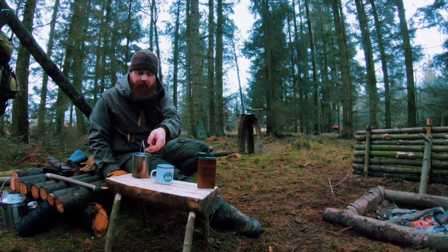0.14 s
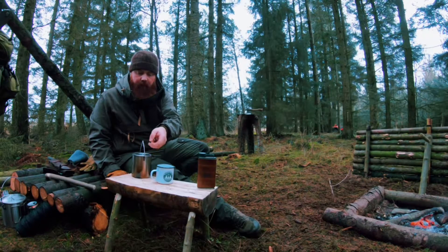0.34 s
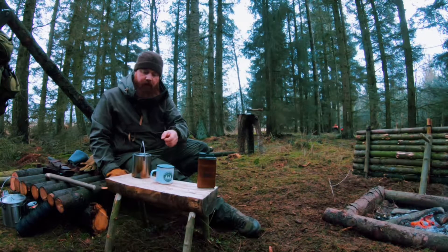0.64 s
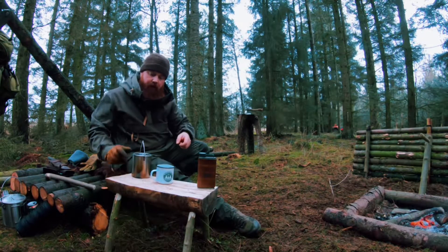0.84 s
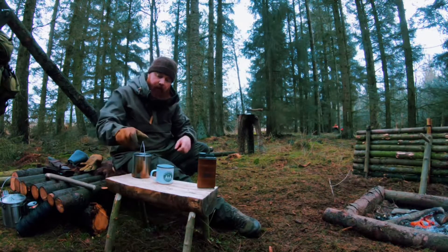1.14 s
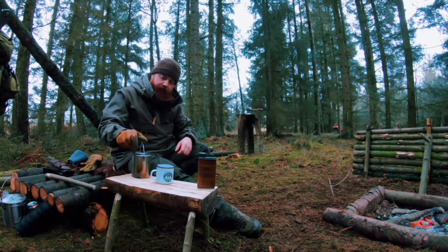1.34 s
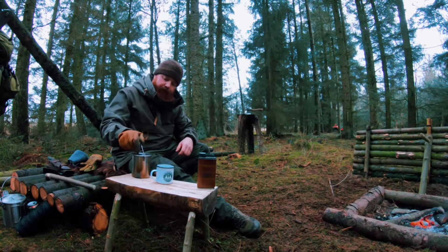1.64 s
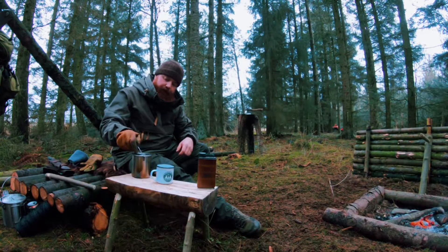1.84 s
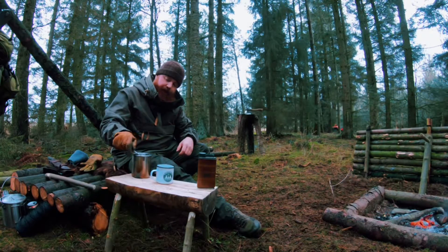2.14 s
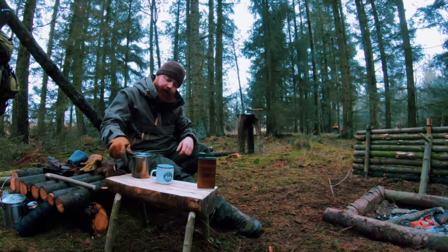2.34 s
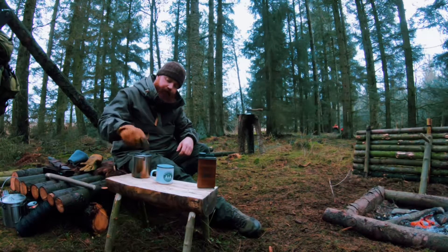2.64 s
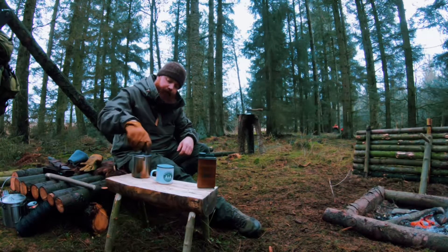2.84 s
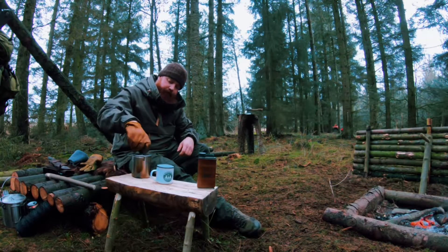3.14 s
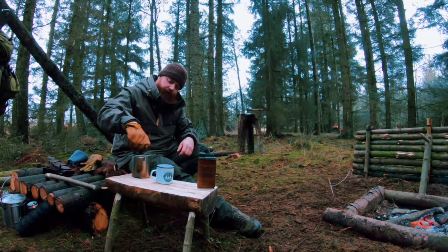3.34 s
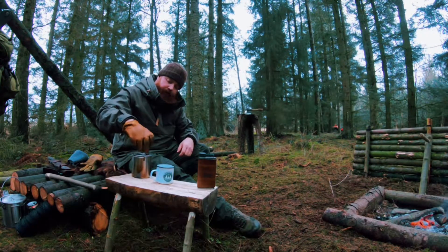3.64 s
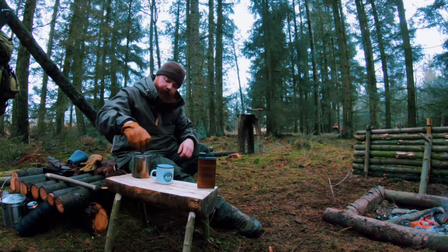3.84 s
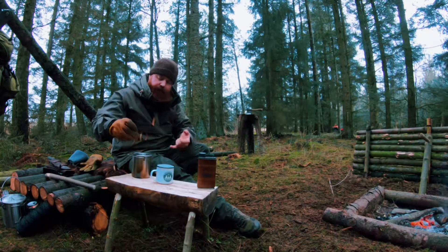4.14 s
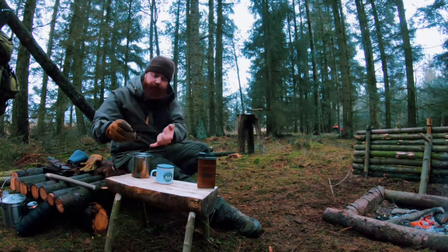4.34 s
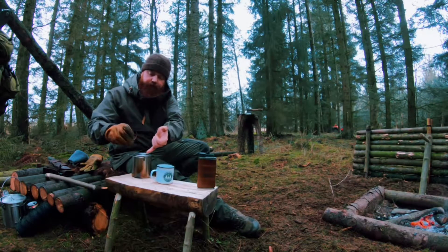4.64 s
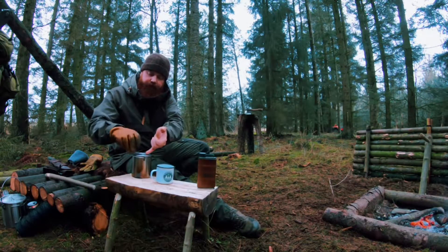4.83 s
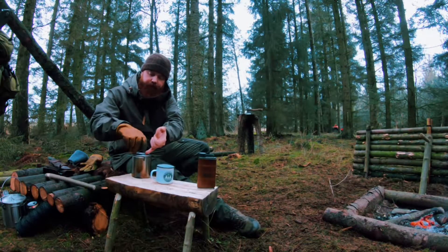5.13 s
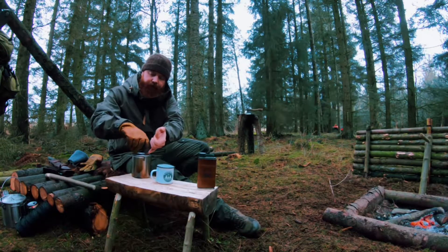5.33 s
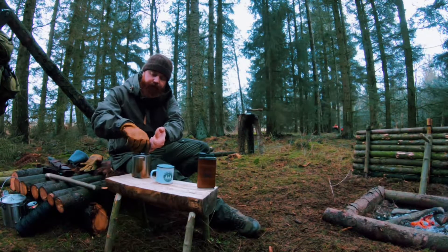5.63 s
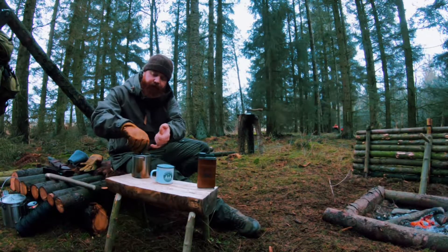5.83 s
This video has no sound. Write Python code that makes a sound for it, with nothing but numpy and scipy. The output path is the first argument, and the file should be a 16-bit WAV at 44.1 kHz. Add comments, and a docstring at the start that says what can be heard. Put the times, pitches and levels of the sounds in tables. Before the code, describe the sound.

Light, uneven metal clinks and tiny scrapes sound near the microphone as a spoon moves around a steel mug, some with a small thud into the plank below. They start with a bright ringing knock, thin out, then get busier in the middle. Two brief sleeve swishes and occasional dry fire cracks fall between them. The outdoor background is a low far-off engine rumble with a faint hiss of trees.

```python
"""Forest camp: a steel spoon stirs and knocks in a steel mug on a plank table.
Each contact skids, rings the thin wall briefly and thuds into the plank; a loose spoon rings on.
A jacket rustles, its zip pull taps, burning wood snaps. Trunks return a faint echo of mug and fire.
Behind: a far engine's rumble, the forest's wash, slow air pressure on the microphone."""
import sys
import numpy as np
from scipy import signal
from scipy.fft import rfft, irfft
from scipy.io import wavfile

SR = 44100
rng = np.random.default_rng(int(sys.argv[2]) if len(sys.argv) > 2 else 0)


def store_wav(level_fs):
    """Save 16-bit WAV to argv[1]."""
    pcm = np.round(np.clip(np.atleast_2d(level_fs), -1, 1) * 32767)
    wavfile.write(sys.argv[1], SR, pcm.T.astype(np.int16))


N = 263718
TIME_S = np.arange(N) / SR

# engine exhaust and whine tones: shaft_multiple, level_db
EXHAUST_TONES = [(2, -40), (3, -38), (4, -48.5), (6, -55.5)]
WHINE_TONES = [(18, -22.5), (36, -10), (54, -16.5)]
# gain curves of exhaust plus rumble, and of the whine: time_s, gain_db
ENGINE_LOW_GAIN = [(0, 0), (2.0, 2.5), (3.85, 2.2), (4.15, -1), (5.95, 0)]
WHINE_GAIN = [(0, -7), (1.6, 0.5), (5.95, 0.5)]
# noise spectra: freq_hz, density_db
RUMBLE_SPECTRUM = [(5, 5), (12, -2), (22, 4), (30, 2.5), (42, -1), (52, -6), (70, -5.5), (90, -7.5),
                   (115, -14.5), (160, -22), (300, -34), (1000, -72)]
WASH_SPECTRUM = [(110, 2), (170, -2), (270, -5), (400, -1.5), (620, 4), (900, 2.5), (1150, 1.5), (1600, -4),
                 (2300, -13), (3500, -21.5), (6000, -37), (16000, -49)]
HISS_SPECTRUM = [(300, -1.5), (2000, 5.5), (4000, 1.5), (7000, 2), (10000, 0.5), (13000, -2), (16000, 1)]
CLOTH_SPECTRUM = [(150, -10), (400, 2), (700, 5.5), (1400, 2.5), (2700, 0), (4000, -7), (6500, -11),
                  (8300, -8), (10000, -19.5), (13000, -12), (16000, -50)]
# sleeve strokes: middle_s, level_db, half_width_s
SLEEVE_STROKES = [(.6, -36.5, 0.16), (0.803, -29, 0.11), (1.02, -38, 0.24), (4.087, -28.7, 0.068),
                  (4.27, -33.8, .15)]
# sleeve folds flicking over, zip pull taps: start_s, level_db
FOLD_FLICKS = [(0.807, -23.5), (4.104, -26)]
ZIP_TAPS = [(0.794, -18), (0.812, -25), (4.1036, -32)]
# fire snaps: start_s, level_db, peak_hz
FIRE_SNAPS = [(1.2706, -37, 5500), (3.125, -31, 7500), (5.301, -18.5, 2900)]
# splits between the thud, body, wall, bright and top bands: edge_hz
BAND_SPLITS_HZ = [800, 1900, 4200, 10000]
# knock balance, one row a band: plain_db, hardness_share, loose_spoon_db
BAND_BALANCE = [(0, -0.14, 0), (-6.5, -.5, 3), (0, -0.037, 0), (-6.5, 0.23, 6), (-14, 0.83, -1)]
# mug wall modes: pitch_hz, level_db
MUG_MODES = [(1060, -4), (1270, 0), (1790, -20), (2250, -4.5), (2510, 1.5), (2610, 0.5), (2710, -1),
             (2930, -8), (3020, -14.5), (3210, -3.5), (3510, -2), (4400, -6), (5000, -3), (5280, -1.5),
             (6020, 3), (6250, -2), (6550, 4), (7200, 7), (7380, 5), (7860, 8), (8080, -5), (8470, 2),
             (8900, -7), (11990, 6.5), (12300, 1), (12700, 7), (13630, 7)]
# the mug's crowded weak modes: freq_hz, density_db
WEAK_MODE_SPECTRUM = [(200, 3), (500, -0.5), (1200, -2.5), (1750, -5.5), (2400, 0.5), (3600, 2.5),
                      (4100, -4.5), (4700, -1), (6000, 5.5), (7900, 3), (9800, -3), (11300, -5.5),
                      (12300, 4), (15500, -5.5)]
# spoon modes: pitch_hz, level_db, t60_s
SPOON_MODES = [(1226, -3, 0.13), (2670, -2.5, 0.13), (3040, 2.5, 0.064), (3235, -0.5, 0.14),
               (3494, 2, 0.057), (4360, -7.5, 0.2), (5930, -8, 0.13), (6040, -18, .28), (7120, 2.5, 0.095),
               (7505, 0, 0.074), (7040, 1, 0.06), (8300, -12, 0.085), (8885, -4, 0.19), (9020, -8, 0.19),
               (10860, -18, .35), (12200, -4, .06), (12800, -1, 0.14), (15470, 0, .08)]
# spoon on mug; hardness adds treble, depth adds thud:
# start_s, level_db, hardness_db, depth_db, skid_s, spoon_ring_db, thud_hz,
# favoured_low_hz, favoured_high_hz
KNOCKS = [(0.057, -29, 7, -11, 0.00094, -15, 520, 3200, 7350),
          (0.1555, -25.5, 2, -4, .016, -13, 442, 3020, 12300),
          (0.1901, -13, 12.5, -10.5, 0.0011, 7, 660, 3460, 8880),
          (1.3143, -23.5, -4, -9, 0.015, -5, 454, 2460, 6020),
          (1.923, -35, 9, 0.5, .004, -6, 200, 3230, 7280),
          (1.9941, -31.5, -2, -11, .005, -10, 400, 3020, 7220),
          (2.0338, -33.5, -5, -6, .002, -14, 220, 3000, 7200),
          (2.42, -38, 5, -2, .005, -20, 640, 3540, 8470), (2.441, -37.5, 9, -9, .013, -6, 200, 2250, 8470),
          (2.735, -20, -2, -6.5, .009, -16, 360, 2550, 6020),
          (2.7787, -31, -6, -20, .001, -22, 640, 2600, 6120),
          (2.9983, -30, -3, -8, .01, -14, 378, 3210, 7600),
          (3.0448, -25.5, 9, -19, 0.0026, -26, 470, 3580, 12700),
          (3.1916, -25.5, -5.5, -2.5, .006, -30, 560, 2690, 7700),
          (3.235, -41, 0, 4, .002, -20, 240, 3550, 7360), (3.401, -36, -7, -9, 0.026, -22, 450, 2120, 4600),
          (3.433, -30.5, -11, -20, 0.0083, -22, 650, 2710, 5000),
          (3.669, -26.5, 4, 0.5, 0.0067, -8, 610, 2540, 7190),
          (3.731, -25, 8, -13, .004, -20, 690, 2500, 5150),
          (3.7403, -16, -3, -18, 0.0054, -13, 710, 2490, 7950),
          (3.8047, -32, 0, 1, .003, -18, 590, 3200, 5010),
          (3.8258, -25, -6, -3.5, .008, -18, 414, 2740, 4950),
          (3.843, -29.5, 0, -12, .01, -16, 370, 2820, 4350),
          (4.884, -29.5, 5, 0, .015, -22, 410, 2610, 11980),
          (4.945, -39.5, -2, -1, .004, -20, 540, 2750, 7210),
          (4.9925, -27, -6, -8, .019, -7, 730, 3300, 4400),
          (5.366, -38, -11, 0, .017, -22, 700, 2520, 6200),
          (5.706, -35, -4, -8, 0.019, -22, 750, 2590, 7450),
          (5.7277, -27, -7, -22, .016, -22, 710, 3500, 12700),
          (5.7549, -23.5, 8, -21, .004, -22, 660, 2610, 11990)]


def amp(db):
    """Decibels to gain."""
    return 10 ** (np.asarray(db) / 20)


def unit_rms(x):
    """Scales to rms 1."""
    return x / np.sqrt(np.mean(x ** 2) + 1e-20)


def add(mix, start_s, sound):
    """Mixes a sound in at start_s."""
    part = mix[max(round(start_s * SR), 0):][:len(sound)]
    part += sound[:len(part)]


def coloured(x, spectrum):
    """Shapes x by a spectrum; rms 1."""
    hz, db = np.transpose(spectrum)
    f = np.fft.rfftfreq(len(x), 1 / SR)
    gain = amp(np.interp(np.log(f + 1), np.log(hz), db))
    return unit_rms(irfft(rfft(x) * gain, len(x)))


def wander(rate_hz):
    """Random drift up to about rate_hz; rms 1."""
    f = np.fft.rfftfreq(N, 1 / SR)
    lowpass = np.exp(-(f / rate_hz) ** 2) * (f > 0)
    return unit_rms(irfft(rfft(rng.standard_normal(N)) * lowpass, N))


def hump(middle_s, half_width_s):
    """Gaussian rise and fall; peak 1."""
    return np.exp(-((TIME_S - middle_s) / half_width_s) ** 2)


def impulses(t, rate_hz=2000):
    """Sparse random impulses."""
    return rng.standard_normal(len(t)) * (rng.random(len(t)) < rate_hz / SR)


def click(t, t60_s, ping_hz=3200):
    """Hard point contact: one pulse, a short ping, a spray of noise."""
    ping = amp(-11) * np.sin(2 * np.pi * ping_hz * t)
    spray = amp(-10) * rng.standard_normal(len(t))
    return amp(4) * (t == 0) + amp(-60 * t / t60_s) * (ping + spray)


def ring(hz, db, t60_s, t):
    """Sum of decaying modes at random phases."""
    phase = rng.random((len(hz), 1))
    envelopes = amp(db[:, None] - 60 * t / t60_s[:, None])
    return (envelopes * np.sin(2 * np.pi * (hz[:, None] * t + phase))).sum(0)


def balanced(blow, bands_db):
    """Sets five band levels by their rms over the first 20 ms."""
    out = 0
    edges_hz = [150, *BAND_SPLITS_HZ, 16500]
    for low_hz, high_hz, db in zip(edges_hz, edges_hz[1:], bands_db):
        bandpass = signal.butter(3, [low_hz, high_hz], "bandpass", fs=SR, output="sos")
        band = signal.sosfilt(bandpass, blow)
        out += amp(db) * band / np.sqrt(np.mean(band[:SR // 50] ** 2))
    return out


def air_pressure(corner_hz=1.97, level_db=-14):
    """Slow pressure swings on the microphone, below hearing."""
    ratio = np.fft.rfftfreq(N, 1 / SR) / corner_hz
    spectrum = np.exp(2j * np.pi * rng.random(len(ratio))) * np.sqrt(ratio) / (1 + ratio ** 4)
    return amp(level_db) * unit_rms(irfft(spectrum, N))


def swell_db():
    """Level of sound carried through the forest: steady but for one broad swell."""
    return -37 + 4.5 * hump(middle_s=3.23, half_width_s=0.8)


def shaft_tones(turns, tones, fade_db):
    """Shaft harmonics, fading in and out on their way through the trees."""
    out = 0
    for multiple, db in tones:
        gain = amp(db + fade_db * wander(4.4))
        out += gain * np.sin(2 * np.pi * (multiple * turns + rng.random()))
    return np.sqrt(2) * out


def far_engine(shaft_hz=21.15, speed_waver=0.00394, rumble_db=-32):
    """Steady engine: exhaust tones in a rumble, and a faint whine."""
    turns = np.cumsum(shaft_hz * (1 + speed_waver * wander(9.8))) / SR
    exhaust = shaft_tones(turns, EXHAUST_TONES, fade_db=3)
    rumble = amp(rumble_db) * coloured(rng.standard_normal(N), RUMBLE_SPECTRUM)
    whine = shaft_tones(turns, WHINE_TONES, fade_db=4)
    low_db = np.interp(TIME_S, *np.transpose(ENGINE_LOW_GAIN))
    whine_db = np.interp(TIME_S, *np.transpose(WHINE_GAIN)) + swell_db()
    return (exhaust + rumble) * amp(low_db) + whine * amp(whine_db)


def forest(wash_gain_db=2, sway_db=1, hiss_db=-40):
    """Distant swelling wash over an even hiss."""
    wash = coloured(rng.standard_normal(N), WASH_SPECTRUM)
    wash *= amp(wash_gain_db + swell_db() + sway_db * wander(7.9))
    return wash + amp(hiss_db) * coloured(rng.standard_normal(N), HISS_SPECTRUM)


def trunk_echo(x, t60_s=0.28, wet_db=-26):
    """Adds the faint, short scatter from the trunks."""
    t = np.arange(SR // 2) / SR
    taps = impulses(t) * amp(-60 * t / t60_s)
    return x + amp(wet_db) * signal.fftconvolve(x, taps / np.linalg.norm(taps))[:N]


def jacket(grain_db=3, flutter_db=1, flick_decay_s=0.0032, puff_hz=650, zip_hz=7550, zip_decay_s=0.0021):
    """Stiff cloth rubs in fine grains, folds flick out puffs of air, the metal zip pull taps."""
    t = np.arange(SR // 20) / SR
    grains = coloured(rng.standard_normal(N) * amp(grain_db * wander(1200)), CLOTH_SPECTRUM)
    strokes = [amp(db) * hump(middle_s, half_width_s) for middle_s, db, half_width_s in SLEEVE_STROKES]
    rub = np.linalg.norm(strokes, axis=0) * amp(flutter_db * wander(30))
    puffs, taps = np.zeros((2, N))
    for start_s, db in FOLD_FLICKS:
        flick = amp(db) * np.exp(-t / flick_decay_s)
        add(rub, start_s, flick)
        add(puffs, start_s, amp(2) * flick * np.sin(2 * np.pi * puff_hz * t))
    for start_s, db in ZIP_TAPS:
        tap = np.sin(2 * np.pi * zip_hz * t) + 0.25 * rng.standard_normal(len(t))
        add(taps, start_s, amp(db) * tap * np.exp(-t / zip_decay_s))
    return grains * rub + puffs + taps


def fire(tail_db=-36, tail_decay_s=0.014, rise_db_per_oct=24, fall_db_per_oct=4, gain_db=-7):
    """Burning wood cracks with almost no ring; each snap has its own level and pitch."""
    out, t = np.zeros(N), np.arange(SR // 10) / SR
    band_centres_hz = np.array([400, 1250, 2800, 6500, 12800])
    for start_s, db, peak_hz in FIRE_SNAPS:
        octaves = np.log2(band_centres_hz / peak_hz)
        bands_db = db + np.minimum(rise_db_per_oct * octaves, -fall_db_per_oct * octaves)
        crack = click(t, t60_s=0.014)
        tail = amp(tail_db) * rng.standard_normal(len(t)) * np.exp(-t / tail_decay_s)
        add(out, start_s, balanced(crack + tail, bands_db))
    return amp(gain_db) * out


def contact(db, hardness_db, depth_db, spoon_ring_db, held_t60_s=0.093, loose_t60_s=0.14):
    """Band levels and ring time: hard is brighter and shorter, deep thuds more, loose rings on."""
    plain_db, hardness_share, loose_spoon_db = np.transpose(BAND_BALANCE)
    looseness = min(amp(spoon_ring_db), 1)
    bands_db = db + plain_db + hardness_share * hardness_db + looseness * loose_spoon_db
    bands_db[0] += depth_db
    pressed_t60_s = max(held_t60_s - 0.0046 * max(hardness_db, 0), held_t60_s / 10)
    return bands_db, (1 - looseness) * pressed_t60_s + looseness * loose_t60_s


def mug_wall(t, t60_s, wall_band_db, favoured_hz, favour_db=11, spread_db=3, detune=0.0056):
    """Wall impulse response: the contact point favours the modes near some pitches; every mode's pitch scatters
    slightly at random."""
    hz, db = np.transpose(MUG_MODES)
    nearness = np.exp(-(np.log(hz[:, None] / favoured_hz) / 0.022) ** 2).max(1)
    pitch_scatter, level_scatter = rng.standard_normal((2, len(hz)))
    # drink and pressing spoon cap the ring time
    mode_t60_s = min(0.9 * t60_s, 0.085) * (hz / np.median(hz)) ** -0.05
    # a light touch is mostly scrape, with weak partials
    light_touch_db = 0.2 * min(wall_band_db + 25, 0)
    mode_db = db + light_touch_db + favour_db * nearness + spread_db * level_scatter
    return ring(hz * (1 + detune * pitch_scatter), mode_db, mode_t60_s, t)


def spoon_in_mug(chatter=0.19, weak_modes_db=11.3, thud_db=9, thud_t60_s=0.056):
    """Each contact skids in tiny blows on the wall; mug and spoon ring, the base thuds on the plank."""
    out, t = np.zeros(N), np.arange(SR // 3) / SR
    for start_s, db, hardness_db, depth_db, skid_s, spoon_ring_db, thud_hz, *favoured_hz in KNOCKS:
        bands_db, t60_s = contact(db, hardness_db, depth_db, spoon_ring_db)
        response = mug_wall(t, t60_s, bands_db[2], favoured_hz)
        force = (t == 0) + chatter * impulses(t) * (t < skid_s)
        wall = signal.fftconvolve(force, response)[:len(t)] / np.linalg.norm(force)
        # weak modes fill the gaps; level held for half the skid
        weak_modes = coloured(rng.standard_normal(len(t)), WEAK_MODE_SPECTRUM)
        weak_modes *= amp(weak_modes_db - 60 * np.maximum(t, skid_s / 2) / (0.95 * t60_s))
        spoon = amp(spoon_ring_db) * ring(*np.transpose(SPOON_MODES), t)
        # a deep or skidding contact ticks less
        tick = amp(26 - 0.43 * depth_db - 600 * skid_s) * click(t, t60_s=0.0045)
        thud = amp(thud_db - 60 * t / thud_t60_s) * np.sin(2 * np.pi * thud_hz * t)
        add(out, start_s, balanced(wall + weak_modes + spoon + tick + thud, bands_db))
    return out


def scene():
    """Mug, fire and jacket in front of the forest; mono."""
    near = trunk_echo(spoon_in_mug() + fire()) + jacket()
    return (near + forest() + far_engine() + air_pressure())[None]


def record(dry):
    """Clip at full scale, then low-pass."""
    cutoff_hz = 15780
    lowpass = signal.firwin(511, cutoff_hz, window=("kaiser", 8), fs=SR)
    return signal.oaconvolve(np.clip(dry, -1, 1), lowpass[None], "same")


dry = scene()
out = record(dry)
store_wav(out)
```